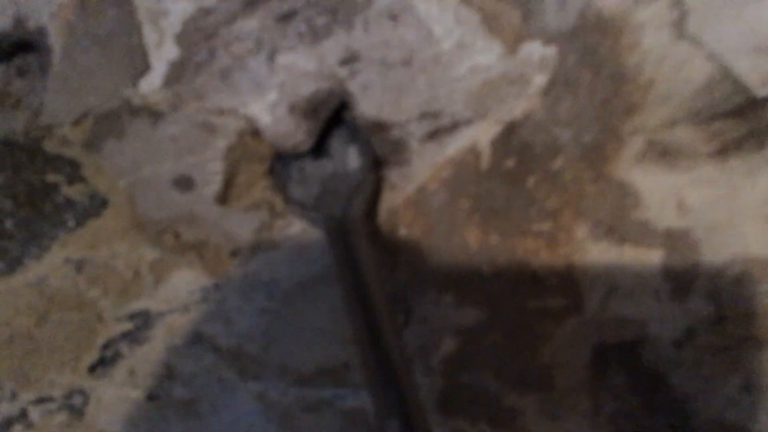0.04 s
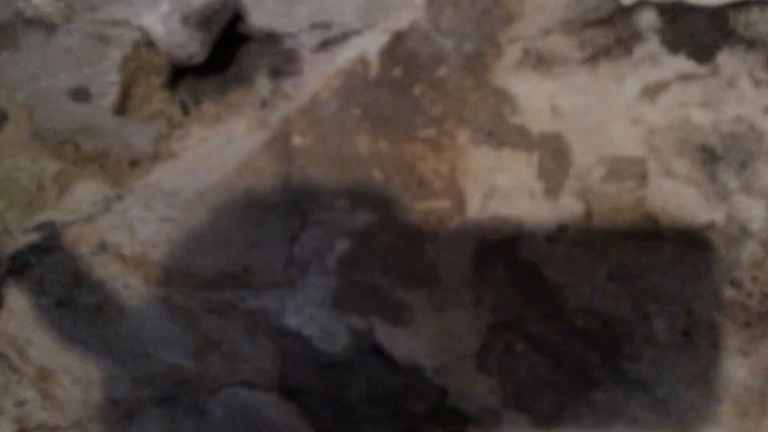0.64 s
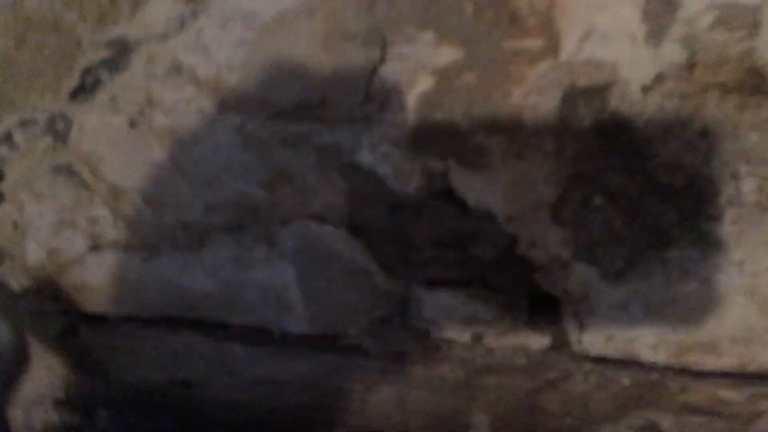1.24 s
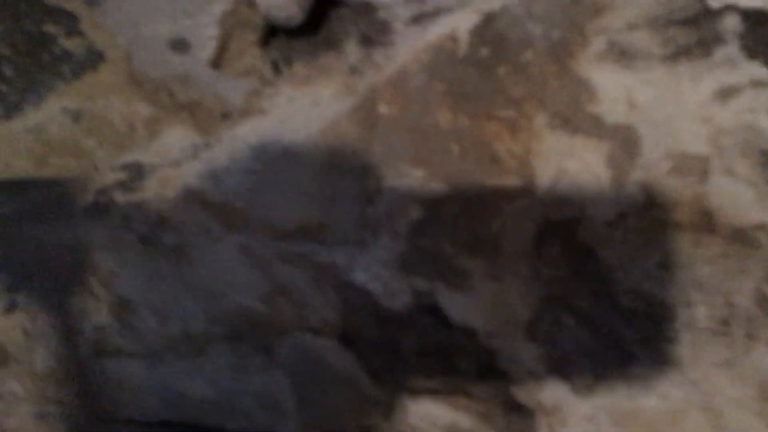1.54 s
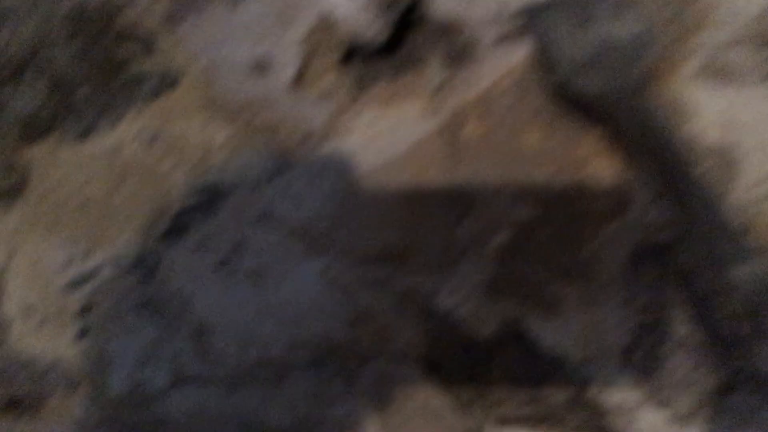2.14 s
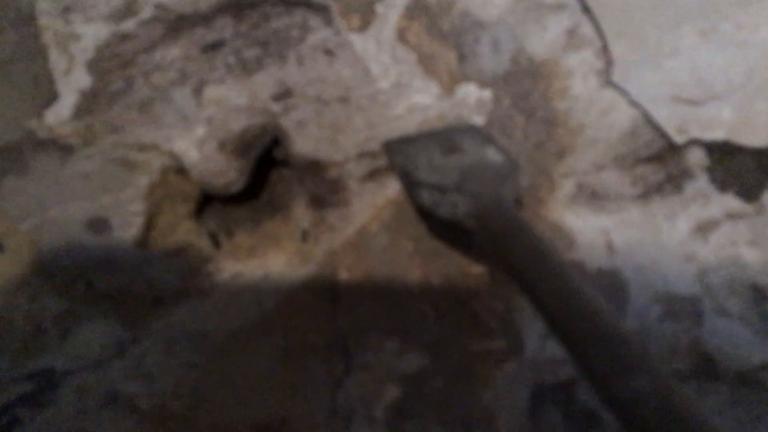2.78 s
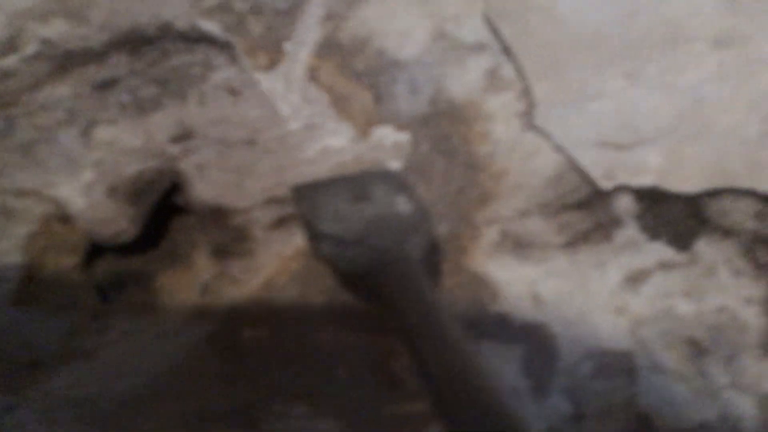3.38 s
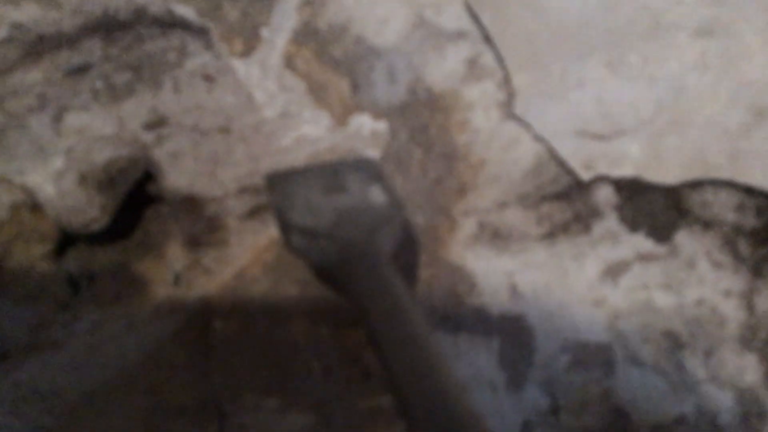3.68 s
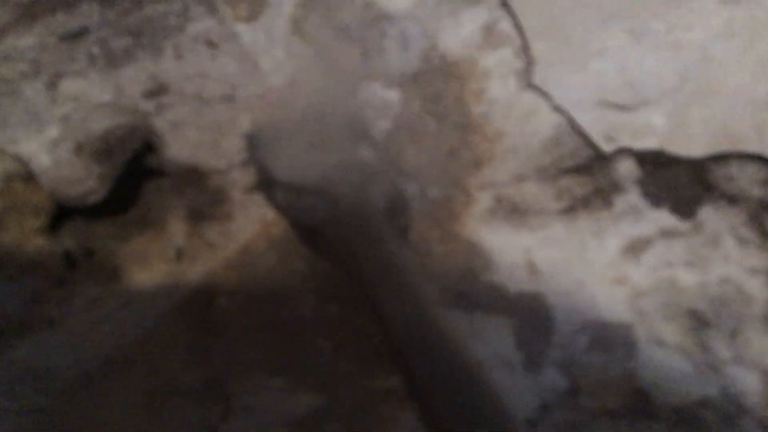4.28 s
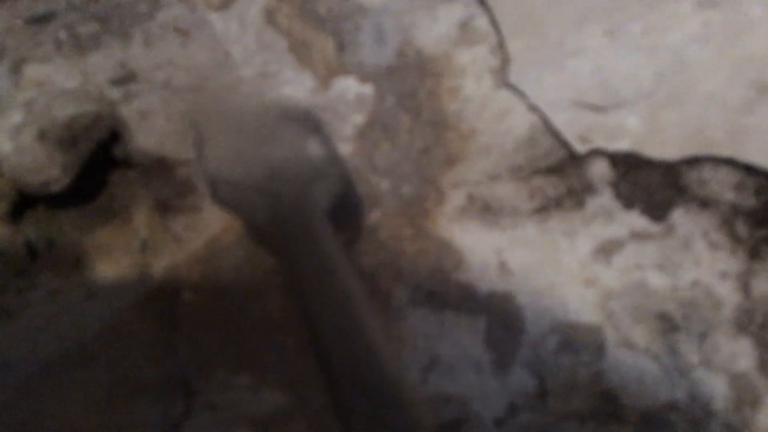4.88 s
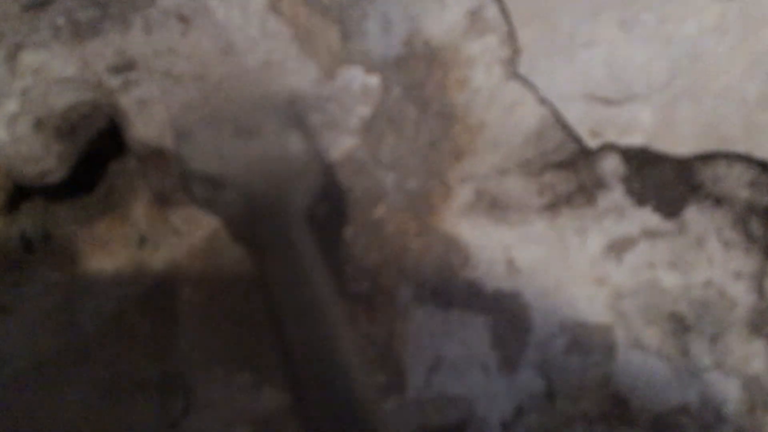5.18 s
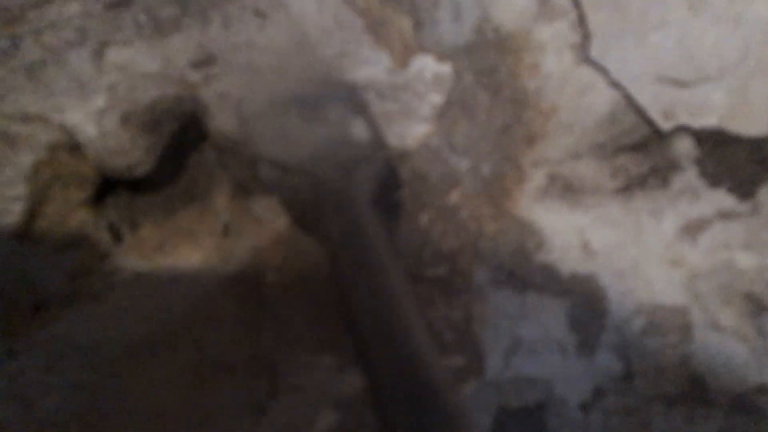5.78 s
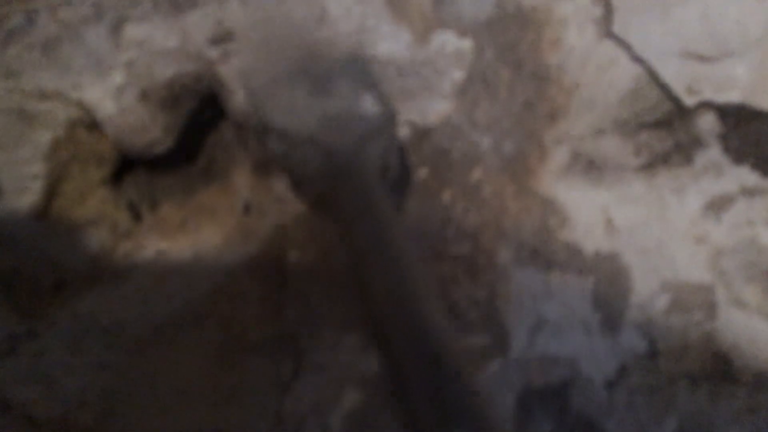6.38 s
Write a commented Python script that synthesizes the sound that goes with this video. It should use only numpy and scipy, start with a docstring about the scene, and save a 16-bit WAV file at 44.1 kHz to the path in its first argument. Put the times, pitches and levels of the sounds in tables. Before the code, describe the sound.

Close indoors, a power chisel's motor winds down, knocks lightly on masonry, then revs up and hammers in a fast metallic rattle.

```python
"""A hammer drill with a chisel works on a masonry wall, close by and indoors.
Its motor coasts, gets a short squeeze of the trigger and runs down: gears whine and rattle, brushes
hiss, and the striker (the weight that hits the chisel) taps idly. The chisel clunks onto the wall.
Then the motor whines up to speed, the striker catches, and about 68 blows a second drive the ringing
steel into the stone while the cooling air buffets the microphone."""
import sys
import numpy as np
from scipy import signal
from scipy.fft import rfft, irfft, next_fast_len
from scipy.io import wavfile
from scipy.ndimage import map_coordinates

SR = 44100
rng = np.random.default_rng(int(sys.argv[2]) if len(sys.argv) > 2 else 0)


def master(y):
    """Save y as 16-bit WAV."""
    cut = np.clip(np.atleast_2d(y).T, -1, 1)
    pcm = np.round(cut * 32767)  # scale
    wavfile.write(sys.argv[1], SR, pcm.astype(np.int16))


N = 283563
TIME = np.arange(N) / SR

# Motor speed is given as mesh pitch: how many gear teeth meet each second.
# Each row: time in seconds, mesh pitch in Hz.
SQUEEZE_SPEED = [(.385, 785), (.41, 870), (.44, 1196), (.49, 1810), (.53, 2004), (.63, 1928)]  # a short squeeze of the trigger
HAMMERING_SPEED = [(3.68, 3214), (3.82, 3198), (3.88, 2955), (3.95, 2835), (4.03, 2861), (4.17, 3078),
                   (4.23, 2860), (4.45, 2811), (4.75, 2799), (6.43, 2780)]  # sags, picks up briefly, then settles
# Rattle and hiss are quieter at first. Each row: time in seconds, gain in dB.
OPENING_GAIN = [(0, -11), (.38, -4.5), (.44, 0)]
# How loudly the gearbox sings. Each row: mesh pitch in Hz, level in dB.
WHINE_LEVELS = [(450, -87), (620, -61), (850, -34.5), (1100, -48), (1370, -49.5), (1620, -29.5),
                (1930, -19.5), (2350, -23), (2750, -21.5), (3200, -19.5)]
# Overtones flare near the gearbox's resonances. Each row: multiple of the mesh pitch,
# level in dB relative to the rattle, resonance in Hz, half its width in Hz.
GEAR_OVERTONES = [(2, -12, 4000, 300), (2, -14, 5550, 550), (3, -15.5, 8750, 750), (4, -28, 11800, 600),
                  (5, -26, 15500, 700)]
# Rough tones of the rotor, the motor's spinning core. Each row: multiple of its turning rate, level in dB.
ROTOR_TONES = [(3, -2.5), (4, 4), (6, -2.5), (7, -3.5), (8, 1), (9, -18), (10, 0.5), (12, -1)]
# How much cooling air hits the microphone. Each row: time in seconds, gain in dB.
AIR_GAIN = [(.3, -17.5), (.6, -5.5), (2.7, 0.5), (3.05, -3), (3.6, 7), (3.85, 3.5), (4.07, -13.5), (4.2, 2),
            (6.4, 4.5)]
# Runs of taps on the loose chisel. Each row: start in seconds, first tap's level in dB, length in seconds.
TAP_RUNS = [(.149, -25, 0), (.5304, -2.5, .03), (.572, -6.5, 0), (.612, -2, 0), (.6539, -9.5, .03),
            (.7004, -0.5, 0), (.7452, -21.5, .06), (.85, -16, 0), (.909, -16.5, .08), (1.0799, -17, .1),
            (2.7615, -4.5, .23)]
# The growl at each pull of the trigger. Each row: time of its peak in seconds, level in dB.
TRIGGER_PULLS = [(0.45, -20), (2.71, -17)]
# The chisel meets the wall and the trigger clicks. Each row: start in seconds, level in dB, then body,
# tick and rebound in dB relative to it, then the scrape's fade time in seconds.
# A fade time (t60) is how long a sound takes to drop by 60 dB.
CONTACTS = [(1.7835, -14.5, 1, -19.5, -22, .04), (1.811, -26, 4, -16, -21, .05),
            (1.831, -26, -3, -8, -13, 0.027), (1.8727, -23.5, 3, 2, -10, .025),
            (1.9005, -22.5, 2.5, 5, -30, .02), (1.929, -18, 2.5, -8.5, -9.5, 0.029),
            (2.013, -42.5, -12, -4.5, -20, .01), (2.171, -30, -8, -7, -4, .05),
            (2.1984, -33.5, -9, -9, -10.5, 0.035), (2.2134, -31.5, -12, -3, -12, .04),
            (2.3283, -48.5, -22, -6.5, -15.5, .025), (2.448, -35, -34, -3, -26, .0074),
            (2.5892, -25, -10, -15, -3.5, 0.031), (2.615, -28.5, -4, -20, -1, 0.12),
            (2.6429, -21.5, -8, -22, -4, 0.02)]
# Ringing of the tool's body and loose chisel. Each row: pitch in Hz, level in dB, fade time in seconds.
BODY_TONES = [(135, -20, .1), (230, -14, .063), (340, -15, .054), (614, -5, .04), (745, 4, .035),
              (790, 3, .045), (1365, -6, .024), (4350, -15, .05), (9050, -27, .07)]
# The striker's force. Each row: time in seconds, knock of tool and wall in dB, ring of the steel in dB.
BLOW_LEVELS = [(3.68, -30, -21), (3.83, -22, -19), (4.008, -20, -19.5), (4.028, -34, -25),
               (4.115, -30, -23), (4.15, -22.5, -21), (4.95, -24.5, -22.5), (5.6, -23.5, -21.3),
               (6.4, -22.5, -20.3)]
# How deep the chisel sits. Each row: time in seconds, depth (0 loose, 1 biting, 2 wedged).
CHISEL_DEPTH = [(3.7, 0), (4.13, 0), (4.35, 1.03), (4.85, 1), (5.1, 1.18), (5.5, 1.906), (6.4, 1.99)]
# Tones of the bending chisel. Each row: pitch in Hz, fade time in seconds, dB when biting, dB when wedged.
BENDING_TONES = [(680, .034, -18, -21), (884, .054, -19, -17), (1680, .04, -19, -5.5),
                 (2115, .035, -6, -17), (2250, .04, -20, -13), (3065, .08, -13.5, -24)]
# The tool bucks, so recoil and air surge. Each row: time in seconds, gain in dB.
BUCKS = [(3.83, 6), (4.32, 6), (4.71, 8), (4.85, 8), (5.57, 4.5), (6.06, 4.5)]
# The room's echo. Each row: frequency in Hz, fade time in seconds.
ROOM_FADE = [(150, 1), (800, .42), (3000, 0.34), (12000, 0.11)]

# A colour says how strong a sound is from bass to treble. Each row: frequency in Hz, level in dB.
HOUSING_COLOUR = [(60, -31), (170, -20), (330, -10.5), (450, -13.5), (540, -8.5), (650, -1), (900, -6),
                  (1150, -6.5), (1520, 1.5), (1850, -2.5), (2200, -3.5), (2700, -8), (3600, -8),
                  (4500, -18), (6500, -26)]  # the motor's rattling case
HISS_COLOUR = [(2120, -34.5), (3600, -11), (3950, -14.5), (4310, 3), (5070, -3), (6200, 0), (7330, -1.5),
               (9240, -1.5), (10300, -6), (13000, -4.5), (16000, -20.5)]  # the motor's hiss and brushes
AIR_COLOUR = [(15, -47.5), (28, -16.5), (45, -3), (80, 1), (130, -8), (200, -11.5), (300, -13.5),
              (450, -25), (800, -48)]  # cooling air on the microphone
BACKGROUND_COLOUR = [(15, -41), (25, -17.5), (137, -3), (285, -15), (734, -16.5), (962, -25.5),
                     (1130, -17.5), (1940, -27.5), (2990, -30), (9070, -34.5), (16000, -46.5)]  # faint, steady background noise
LOOSE_RING_COLOUR = [(3500, -16), (5000, -15), (6900, -3), (8100, -10), (9400, -3), (10200, -9.5),
                     (10950, 5.5), (11550, -9), (12200, 0), (13200, -10), (13750, -16.5), (14500, -14),
                     (16000, -14.5)]  # the chisel ringing freely
BUMP_COLOUR = [(40, -20), (90, -4.5), (160, -0.5), (250, -18), (600, -42.5)]  # the tool being moved
SCRAPE_COLOUR = [(530, -53), (900, -15.5), (1160, 7.5), (1590, 0.5), (2330, 1.5), (2830, 0), (3110, 4.5),
                 (4310, -2), (7680, -12.5), (11600, -18), (16000, -22)]  # the scrape of a contact
TICK_COLOUR = [(1500, -30.5), (4000, -7.5), (6000, -1), (8000, -8), (8600, -1.5), (9100, 1), (9600, -4),
               (10200, -13.5), (12000, -4), (14000, -11.5), (16000, -11.5)]  # the bright tick of a contact
BITING_RING_COLOUR = [(2650, -35.5), (4500, -8), (4910, -22), (5300, -8), (6070, -11.5), (7030, 0.5),
                      (7580, -3.5), (8050, -11.5), (8830, -8), (9580, -2.5), (10900, -6.5), (11300, -9),
                      (13600, -9.5), (16000, -19), (16500, -29.5)]  # the chisel biting into stone
WEDGED_RING_COLOUR = [(2650, -19), (4500, -9.5), (5040, -14), (6070, -8.5), (6990, -1), (7710, -3),
                      (8320, -5.5), (8980, -11.5), (10300, -5.5), (11400, -11.5), (13700, -10),
                      (16100, -22), (16500, -14)]  # the chisel stuck tight
BITING_KNOCK_COLOUR = [(220, -32.5), (380, -2), (508, -6), (542, -8), (579, -5.5), (1300, -4), (1460, -3),
                       (1810, -10), (2110, -6.5), (2680, -7), (3040, -5), (5000, -18.5), (6500, -37.5),
                       (11000, -120)]  # tool and wall, chisel loose or biting
WEDGED_KNOCK_COLOUR = [(220, -26), (380, -3.5), (548, -5.5), (783, -9), (1050, -3), (1420, -7.5), (1660, 6),
                       (1850, -7.5), (2330, -3.5), (2650, -9), (4210, -4.5), (5000, -24), (6500, -48),
                       (11000, -120)]  # tool and wall, chisel stuck tight
RECOIL_COLOUR = [(20, -40.5), (40, 11), (68, -8.5), (100, 1.5), (135, -7), (205, -8.5), (350, -13),
                 (700, -29.5)]  # the tool kicking back

CRANK_TEETH, PINION_TEETH = 41, 5  # the motor's small gear (pinion) turns the crank that drives the piston
FREE_HZ = 3246  # mesh pitch at full speed with no load
FIRST_BLOW_S = 3.6804


def amp(db):
    """Turn decibels into a gain to multiply by."""
    return np.exp(np.asarray(db) * (np.log(10) / 20))


def unit(x):
    """Scale a signal to an average (rms) level of 1."""
    return x / np.sqrt(np.mean(x ** 2) + 1e-20)


def along(points, hz):
    """Read a table of (Hz, value) rows on a logarithmic frequency scale."""
    frequencies, values = np.transpose(points)
    return np.interp(np.log(hz + 1), np.log(frequencies + 1), values)


def curves(rows, at=TIME):
    """Read each column after the time column at the given moments."""
    seconds, *columns = np.transpose(rows)
    return [np.interp(at, seconds, column) for column in columns]


def wobble(rate):
    """A smooth curve through `rate` random values a second."""
    step = 16
    knots = rng.standard_normal(int(N * rate / SR) + 4)
    return np.repeat(map_coordinates(knots, [TIME[::step] * rate]), step)[:N]


def coloured(x, colour):
    """Filter a signal to give it a colour."""
    size = 4096
    cepstrum = irfft(np.log(amp(along(colour, np.fft.rfftfreq(size, 1 / SR)))))
    # folding this in half makes the filter ring only after a hit, never before it
    cepstrum[1:size // 2] *= 2
    cepstrum[size // 2 + 1:] = 0
    return signal.oaconvolve(x, irfft(np.exp(rfft(cepstrum))))[:N]


def noise(colour):
    """Steady coloured noise at an average level of 1."""
    return unit(coloured(rng.standard_normal(N), colour))


def place(times, rows):
    """Start one row of sound at each time and add them up."""
    index = np.round(np.asarray(times) * SR).astype(int)[:, None] + np.arange(rows.shape[1])
    return np.bincount(index.ravel(), rows.ravel(), N)[:N]


def bursts(count, attack, t60, tail_db, tail_t60, memory=0):
    """Noisy hits of energy 1, timed in seconds; memory (0 to 1) is how much each resembles the last."""
    t = np.arange(SR // 25) / SR
    fresh = rng.standard_normal((count, len(t)))
    fresh[1:] *= np.sqrt(1 - memory ** 2)
    rise = 1 - np.exp(-(t / attack) ** 2)
    fade = amp(-60 * t / t60) + amp(tail_db - 60 * t / tail_t60)
    rows = signal.lfilter([1], [1, -memory], fresh, axis=0) * rise * fade
    return rows / np.linalg.norm(rows, axis=1, keepdims=True)


def uneven(count, db):
    """A random gain for each hit, typically `db` decibels up or down."""
    return amp(db * rng.standard_normal((count, 1)))


def struck(times, rows, colour):
    """Place hits in time and colour them, keeping their total energy."""
    hits = place(times, rows)
    return unit(coloured(hits, colour)) * np.std(hits)


def coast(start_hz, t):
    """Mesh pitch falls as friction and the fan's drag slow the motor to a stop."""
    friction_hz_per_s, drag_s = 963, 1.51
    friction_hz = friction_hz_per_s * drag_s
    return np.maximum((start_hz + friction_hz) * np.exp(-t / drag_s) - friction_hz, 1)


def motor_speed():
    """Mesh pitch: the motor coasts, gets a short push, stops, spins up and sags under the hammer."""
    opening_hz, restart_s = 1448, 2.64
    quick_s, slow_s, quick_share = .09, .257, .458  # spinning up has a quick part and a slow part
    squeeze_s = SQUEEZE_SPEED[0][0]
    release_s, release_hz = SQUEEZE_SPEED[-1]
    since = np.maximum(TIME - restart_s, 0)
    shortfall = quick_share * np.exp(-since / quick_s) + (1 - quick_share) * np.exp(-since / slow_s)
    spin_up = np.maximum(FREE_HZ * (1 - shortfall), 1)
    run_down = coast(release_hz, TIME - release_s)
    stages = [coast(opening_hz, TIME), curves(SQUEEZE_SPEED)[0], run_down, spin_up]
    ends_s = [squeeze_s, release_s, restart_s, FIRST_BLOW_S]
    return np.select([TIME < end for end in ends_s], stages, curves(HAMMERING_SPEED)[0])


def motor_levels(mesh_hz):
    """Rattle, hiss and whine in dB: they follow the speed and drop under the hammer's load."""
    decades = np.log10(mesh_hz / FREE_HZ)  # -1 means a tenth of full speed
    strain = np.clip(np.gradient(mesh_hz) * SR / 16000, 0, 2)  # gears rattle harder while speeding up
    load = np.clip((TIME - FIRST_BLOW_S) / .3, 0, 1)  # hammering presses the teeth together
    # rattle, hiss and whine dip briefly, then come back
    dip_db = -14 * np.exp(-((TIME - 4.04) / .09) ** 2)
    opening_db, = curves(OPENING_GAIN)
    rattle_db = -14 + 24.5 * decades + 6 * strain - 15 * load + opening_db + .5 * dip_db
    hiss_db = -25 + 28.5 * decades - 8 * load ** 3 + opening_db + dip_db
    whine_db = along(WHINE_LEVELS, mesh_hz) - 32 * load ** 2.5 + dip_db
    return rattle_db, hiss_db, whine_db


def gear_whine(mesh_angle, crank_angle, coasting):
    """Meeting teeth make a tone; at low speed they drift in and out of contact, so it comes in bursts."""
    tone = np.sqrt(2) * np.sin(mesh_angle) * amp(1.1 * wobble(35))
    flutter_db = 20 * np.sin(1.5 * crank_angle) + 10 * wobble(110) - 6
    return tone * amp(np.clip(coasting - .35, 0, 1) * flutter_db)


def tooth_slap(mesh_hz, mesh_angle):
    """Slapping teeth add overtones, each loudest near a resonance of the gearbox."""
    return np.sqrt(2) * sum(amp(db) / (1 + ((k * mesh_hz - hz) / width) ** 4) * np.sin(k * mesh_angle)
                            for k, db, hz, width in GEAR_OVERTONES)


def housing_rattle(mesh_hz, shaft_angle, crank_angle, coasting):
    """Gear noise and rough rotor tones throb with the piston; tones swell at the case's resonances."""
    tones = 0
    for multiple, db in ROTOR_TONES:
        resonance_db = 1.7 * along(HOUSING_COLOUR, multiple * mesh_hz / PINION_TEETH)
        tones += amp(db + resonance_db) * wobble(60) * np.sin(multiple * shaft_angle + wobble(60))
    # a slow piston makes the gears rattle at both ends of its stroke
    throb_db = (-3.5 + 9.1 * coasting) * np.sin(2 * crank_angle) + .98 * np.sin(crank_angle)
    return (.79 * noise(HOUSING_COLOUR) + (.24 + .71 * coasting) * tones) * unit(amp(throb_db))


def brush_whirr(shaft_angle):
    """The motor's brushes rub the same rough contact ring every turn, making many high tones."""
    harmonics, size = 50, 2048
    roughness = rng.standard_normal(harmonics) + 1j * rng.standard_normal(harmonics)
    surface = irfft(np.r_[0, roughness], size)
    position = (shaft_angle / (2 * np.pi) * size).astype(int) % size
    return unit(coloured(surface[position], HISS_COLOUR))


def motor_hiss(shaft_angle, crank_angle, coasting):
    """Hiss and brush whirr throb with the piston; the whirr stands out at low speed."""
    hiss = .85 * noise(HISS_COLOUR)
    whirr = .95 * coasting * brush_whirr(shaft_angle) + .13 * brush_whirr(shaft_angle)
    return (hiss + whirr) * amp(.9 * np.sin(crank_angle) + 1.5 * wobble(300))


def motor(mesh_hz, crank_turns):
    """The turning motor and its gears: whine, rattle, hiss and a growl on starting."""
    rattle_db, hiss_db, whine_db = motor_levels(mesh_hz)
    coasting = np.clip(1 - mesh_hz / 2600, 0, 1)  # 0 when fast, 1 at rest
    crank_angle = 2 * np.pi * crank_turns
    # squeezing the air slows the gears once a turn, and slack between the teeth makes them flutter
    mesh_angle = CRANK_TEETH * crank_angle + .15 * np.sin(crank_angle)
    mesh_angle += .08 * wobble(120) + .2 * wobble(20)
    shaft_angle = mesh_angle / PINION_TEETH
    whine = gear_whine(mesh_angle, crank_angle, coasting)
    # the teeth slap when the whine stands out of the rattle
    slap = np.clip(amp(whine_db - rattle_db + 8), 0, 1) * tooth_slap(mesh_hz, mesh_angle)
    rattle = housing_rattle(mesh_hz, shaft_angle, crank_angle, coasting)
    growl = starting_growl(shaft_angle)
    hiss = motor_hiss(shaft_angle, crank_angle, coasting)
    return amp(whine_db) * whine + amp(rattle_db - 2) * (rattle + slap) + amp(hiss_db) * hiss + growl


def cooling_air(mesh_hz):
    """The fan's exhaust buffets the microphone in lumps, harder the faster it turns."""
    draught_db, = curves(AIR_GAIN)
    db = -25.5 + 58 * np.log10(mesh_hz / FREE_HZ) + draught_db + bucking_db(TIME)
    return amp(db) * unit(noise(AIR_COLOUR) * amp(2.5 * wobble(35)))


def idle_taps(turns):
    """The striker taps the loose chisel once a crank turn, in short runs that fade."""
    fade_db_per_turn, scatter_db = .55, 2.5
    times, levels_db = [], []
    for start_s, first_db, length_s in TAP_RUNS:
        first, last = np.interp([start_s, start_s + length_s], TIME, turns)
        repeat = np.arange(int(last - first) + 1)
        times.extend(np.interp(first + repeat, turns, TIME))
        chance_db = scatter_db * rng.standard_normal(len(repeat)) * (repeat > 0)
        levels_db.extend(first_db - fade_db_per_turn * repeat + chance_db)
    taps = bursts(len(times), attack=.0003, t60=.0076, tail_db=-27.5, tail_t60=.05, memory=.78)
    return struck(times, taps * amp(np.array(levels_db) + 10.5)[:, None], LOOSE_RING_COLOUR)


def starting_growl(shaft_angle):
    """The rotor growls under the rush of current at each pull of the trigger."""
    rise_db_per_s, fall_db_per_s = 420, 233.5
    pulls_db = [db - np.maximum(rise_db_per_s * (peak_s - TIME), fall_db_per_s * (TIME - peak_s))
                for peak_s, db in TRIGGER_PULLS]
    growl = np.sqrt(2) * np.sin(7 * shaft_angle + .5 * wobble(220)) * amp(2.5 * wobble(130))
    return amp(np.max(pulls_db, axis=0)) * growl


def handling_bump(at_s=1.11, half_width_s=.05, db=-43):
    """A soft, dull swell of noise as the tool is moved."""
    return amp(db) * np.exp(-((TIME - at_s) / half_width_s) ** 2) * noise(BUMP_COLOUR)


def clunks(rebound_s=.01):
    """Each contact ticks, scrapes briefly and rings the hollow body, then bounces once."""
    start_s, db, body_db, tick_db, rebound_db, scrape_t60 = np.transpose(CONTACTS)
    times = np.r_[start_s, start_s + rebound_s]
    count = len(times)
    db = np.r_[db, db + rebound_db][:, None]
    body_db, tick_db, scrape_t60 = (np.r_[col, col][:, None] for col in (body_db, tick_db, scrape_t60))
    scrape = bursts(count, attack=.0014, t60=scrape_t60, tail_db=-34, tail_t60=.08) * amp(db + 12.5)
    tick = bursts(count, attack=.0002, t60=.008, tail_db=-24, tail_t60=.06) * amp(db + tick_db + 14)
    t = np.arange(SR // 8) / SR
    ring = sum(uneven(count, db=2) * amp(level - 60 * t / t60) * np.sin(2 * np.pi * hz * t)
               for hz, level, t60 in BODY_TONES)
    ring *= (1 - np.exp(-t / .0025)) * amp(db + body_db - 6)
    return struck(times, scrape, SCRAPE_COLOUR) + struck(times, tick, TICK_COLOUR) + place(times, ring)


def chisel_ring(times, strength, loose, biting, wedged):
    """The struck steel cracks and rings; its tones shift as the stone grips the tip."""
    steel = bursts(len(times), attack=.00015, t60=.01, tail_db=-33.5, tail_t60=.07, memory=.91)
    grit = bursts(len(times), attack=.00027, t60=.0082, tail_db=-30, tail_t60=.091)
    crack = (.53 * steel + .85 * grit) * strength
    return (struck(times, crack * loose, LOOSE_RING_COLOUR)
            + struck(times, crack * biting, BITING_RING_COLOUR)
            + struck(times, crack * wedged, WEDGED_RING_COLOUR))


def steel_pulse():
    """One blow of energy 1 after its way down the steel: treble arrives first, bass last."""
    hz = np.fft.rfftfreq(SR // 25, 1 / SR)
    delay_s = .000796 + .002205 / (1 + hz / 2500)
    wave = irfft(np.exp(-2j * np.pi * np.cumsum(delay_s) * hz[1]))
    return wave / np.linalg.norm(wave)


def wall_knock(times, strength, loose, biting, wedged):
    """Each blow travels down the steel and knocks in the tool and the wall."""
    count = len(times)
    knocks = bursts(count, attack=.0011, t60=.017, tail_db=-28, tail_t60=.08, memory=.975)
    crumbs = bursts(count, attack=.00096, t60=.017, tail_db=-27.5, tail_t60=.07, memory=.035)
    thud = (.47 * steel_pulse() + .42 * knocks + .61 * crumbs) * uneven(count, db=1.2) * strength
    return (struck(times, thud * np.hypot(loose, biting), BITING_KNOCK_COLOUR)
            + struck(times, thud * wedged, WEDGED_KNOCK_COLOUR))


def recoil(times, strength, delay_s=.0023):
    """The tool kicks back just after each blow: one low push of uneven size."""
    push = np.hanning(SR // 400)
    pushes = push / np.linalg.norm(push) * strength * uneven(len(times), db=3.3)
    return struck(times + delay_s, pushes, RECOIL_COLOUR)


def bucking_db(at, half_width_s=.035):
    """The dB that recoil and air gain at the given moments as the tool bucks."""
    return sum(db * np.exp(-((at - peak_s) / half_width_s) ** 2) for peak_s, db in BUCKS)


def chisel_bending(times, strength, biting, wedged, delay_s=.001006):
    """Once the stone holds its tip, the chisel bends to and fro with a few short tones at each blow."""
    t = np.arange(SR // 25) / SR
    bending = 0
    for hz, t60, biting_db, wedged_db in BENDING_TONES:
        tone = amp(-60 * t / t60) * np.sin(2 * np.pi * hz * t)
        size = (biting * amp(biting_db) + wedged * amp(wedged_db)) * uneven(len(times), db=2)
        bending += size * tone / np.linalg.norm(tone)
    return place(times + delay_s, bending * strength)


def hammer(mesh_hz, crank_turns):
    """The striker hits once a crank turn: the chisel rings, then tool and wall knock and thump."""
    jitter_s, swell_db = 2e-5, 2
    times = np.interp(np.arange(int(crank_turns[-1]) + 1), crank_turns, TIME)
    times += jitter_s * rng.standard_normal(len(times))
    moments = times[:, None]
    knock_db, ring_db = curves(BLOW_LEVELS, moments)
    recoil_db = knock_db - 5 + bucking_db(moments) + swell_db * np.interp(moments, TIME, wobble(14))
    gap_samples = np.interp(moments, TIME, SR * CRANK_TEETH / np.maximum(mesh_hz, 1))
    force = np.sqrt(gap_samples) * uneven(len(times), db=.5)  # keeps loudness apart from blow rate
    depth, = curves(CHISEL_DEPTH, moments)
    # blend between the three ways the stone can hold the chisel
    loose, biting, wedged = (np.sqrt(np.clip(1 - abs(depth - stage), 0, 1)) for stage in range(3))
    ring = chisel_ring(times, force * amp(ring_db - .54), loose, biting, wedged)
    knock = wall_knock(times, force * amp(knock_db), loose, biting, wedged)
    bending = chisel_bending(times, force * amp(knock_db - 2.5), biting, wedged)
    return ring + knock + bending + recoil(times, force * amp(recoil_db))


def room_echo(x):
    """The bare room answers 5 ms later; its treble dies first."""
    hz, t, spectrum = signal.stft(rng.standard_normal(SR // 2), SR, nperseg=256)
    fade = amp(-60 * t / along(ROOM_FADE, hz)[:, None])
    tail = signal.istft(spectrum * fade, SR, nperseg=256)[1]
    return signal.fftconvolve(np.pad(x, (SR // 200, 0)), tail / np.linalg.norm(tail))[:N]


def scene():
    """One motor speed drives whine, rattle, air and blows; both channels carry the same mix."""
    mesh_hz = motor_speed()
    turns = np.cumsum(mesh_hz) / SR / CRANK_TEETH
    crank_turns = turns - np.interp(FIRST_BLOW_S, TIME, turns)  # counted from the first blow
    drive = motor(mesh_hz, crank_turns)
    impacts = hammer(mesh_hz, crank_turns) + idle_taps(turns)
    contacts = clunks()
    echo = room_echo(amp(-12.5) * drive + amp(-16.5) * impacts + amp(-14.5) * contacts)
    mono = drive + impacts + contacts + echo + cooling_air(mesh_hz) + handling_bump()
    mono += amp(-62) * noise(BACKGROUND_COLOUR)
    return np.array([mono, mono])


def record(dry):
    """Round off the highest peaks and cut away the very top of the treble."""
    ceiling, hardness, top_hz = .68, 6, 15950
    rounded = dry / (1 + np.abs(dry / ceiling) ** hardness) ** (1 / hardness)
    size = next_fast_len(N + SR // 4)
    in_band = np.fft.rfftfreq(size, 1 / SR) < top_hz
    return irfft(rfft(rounded, size) * in_band, size)[:, :N]


dry = scene()
out = record(dry)
master(out)
```